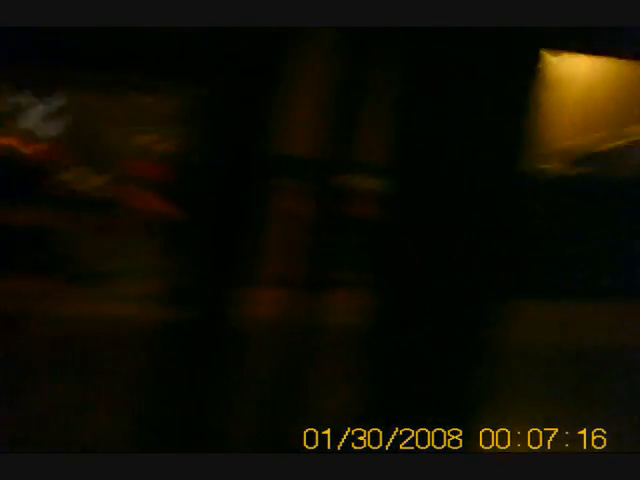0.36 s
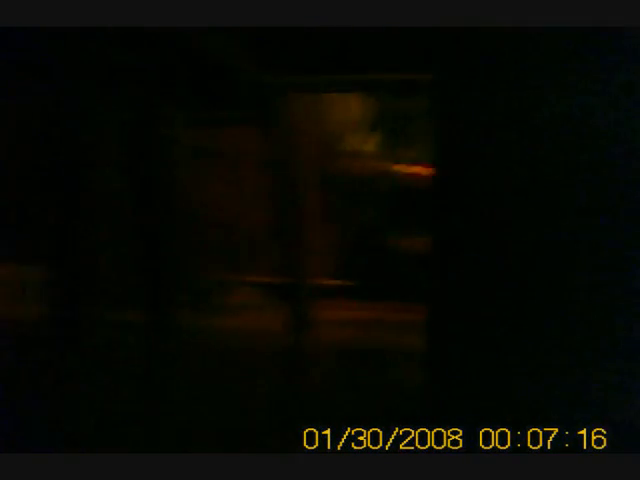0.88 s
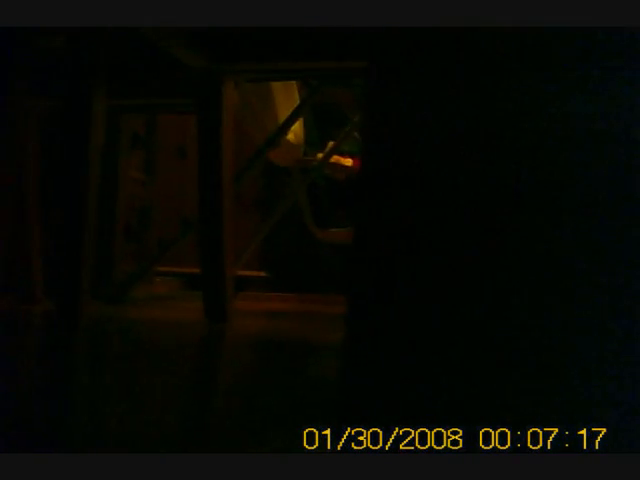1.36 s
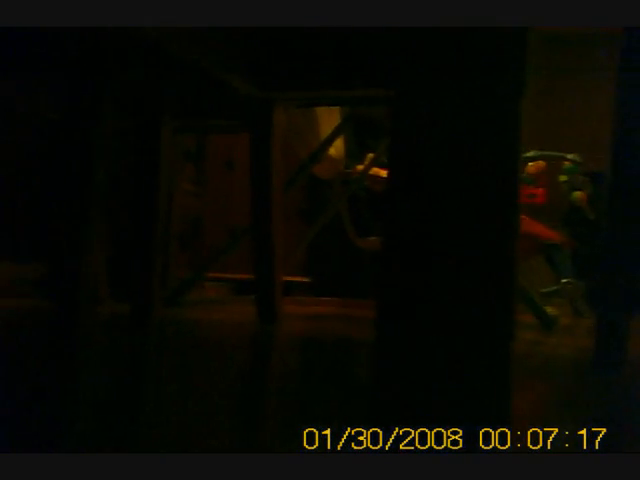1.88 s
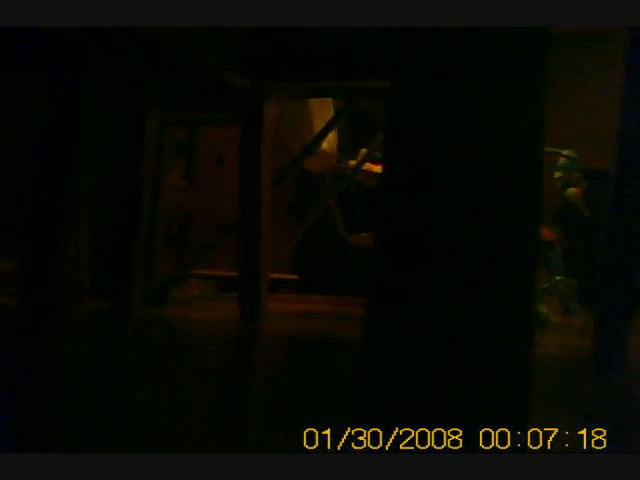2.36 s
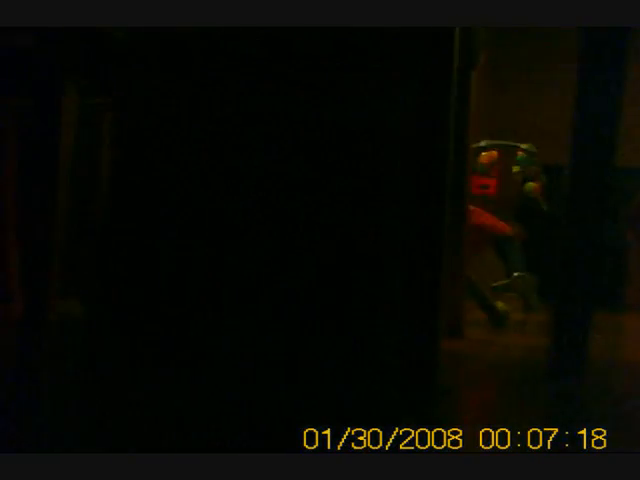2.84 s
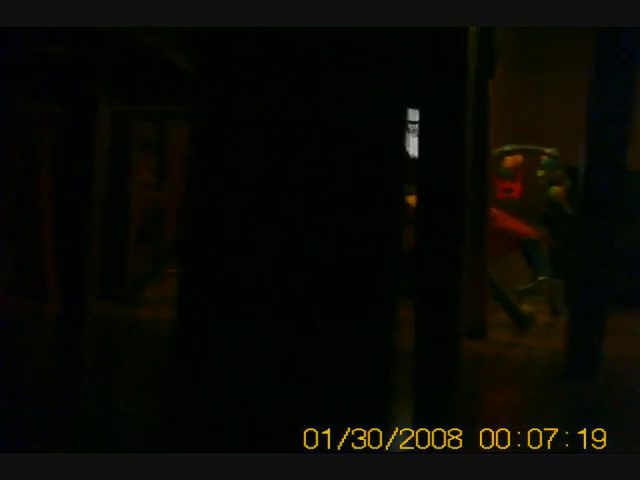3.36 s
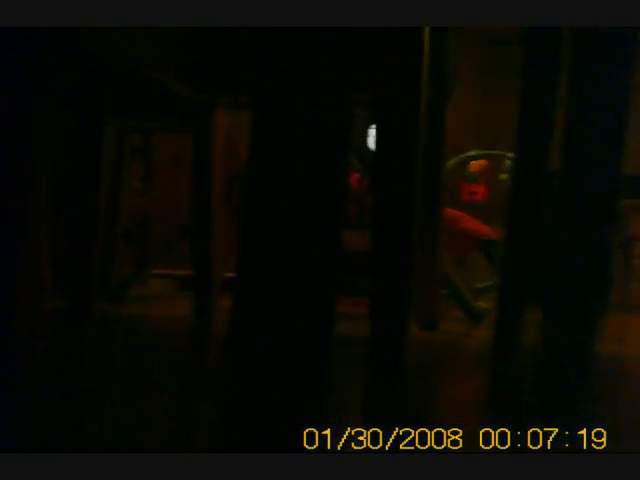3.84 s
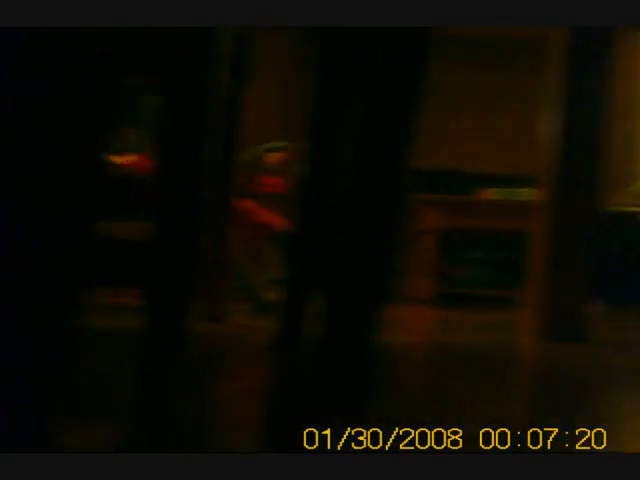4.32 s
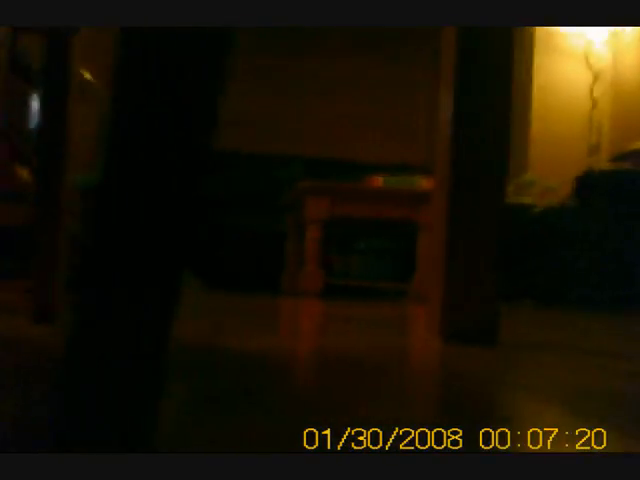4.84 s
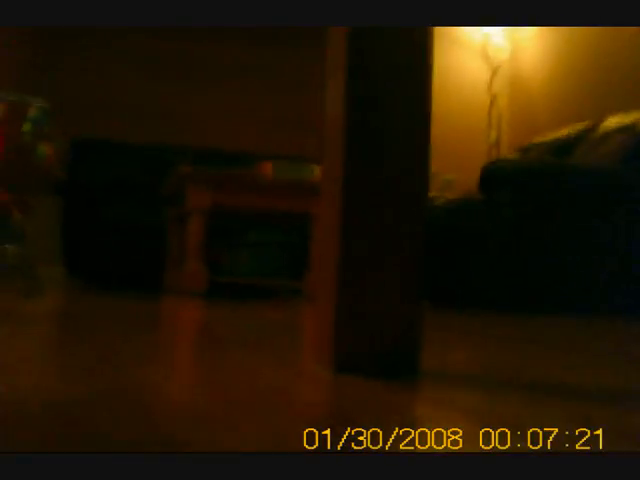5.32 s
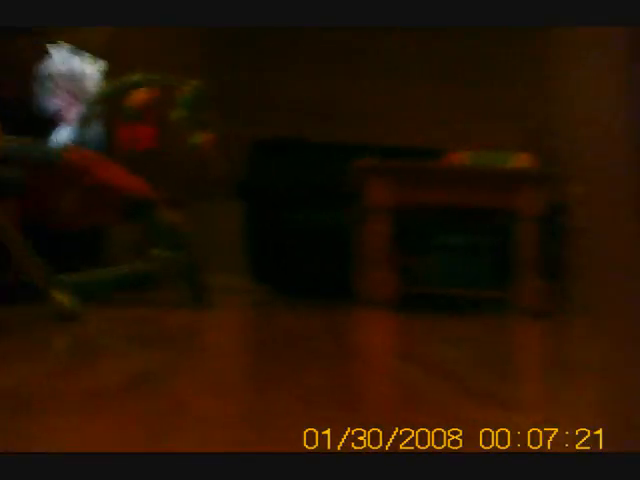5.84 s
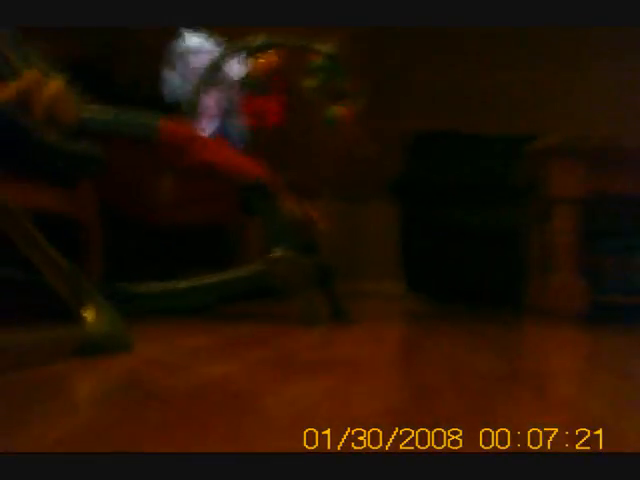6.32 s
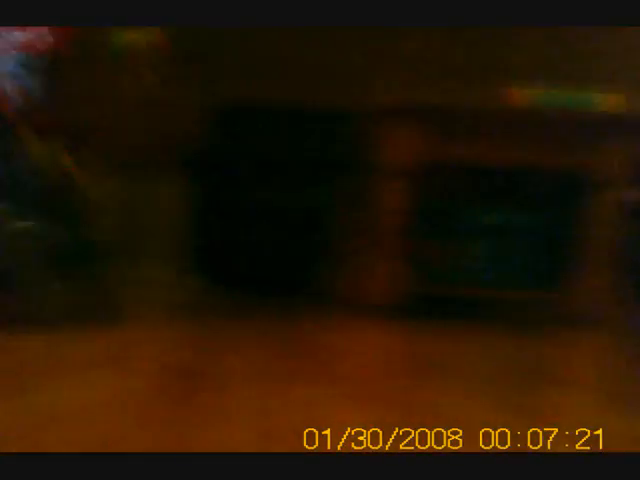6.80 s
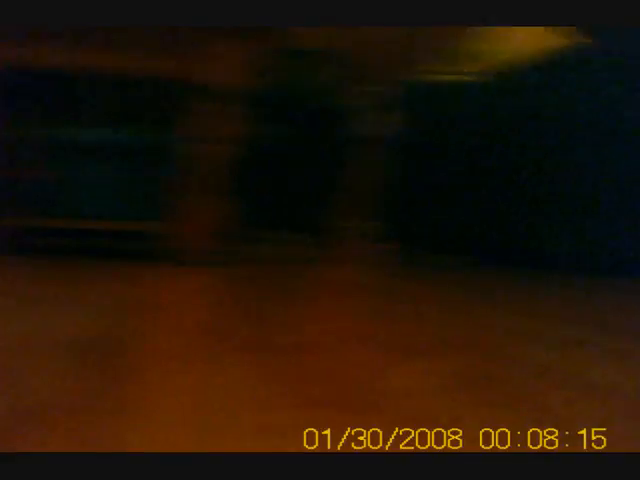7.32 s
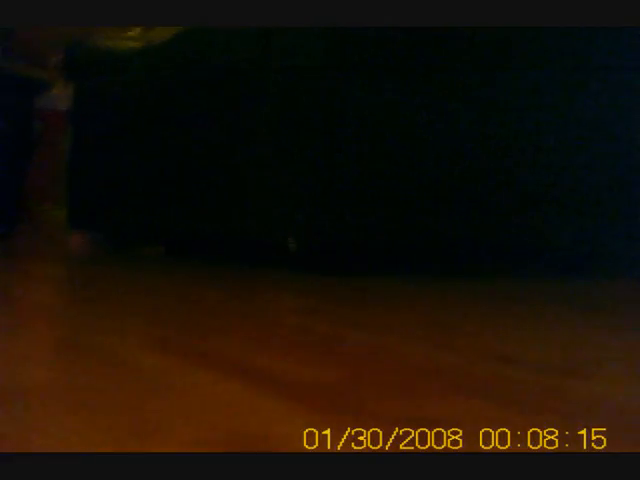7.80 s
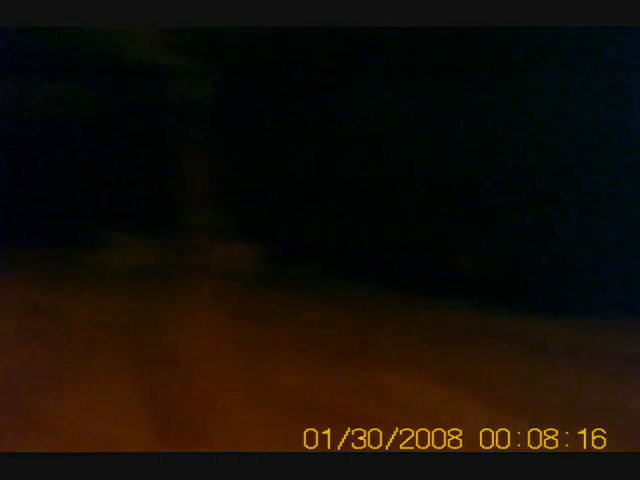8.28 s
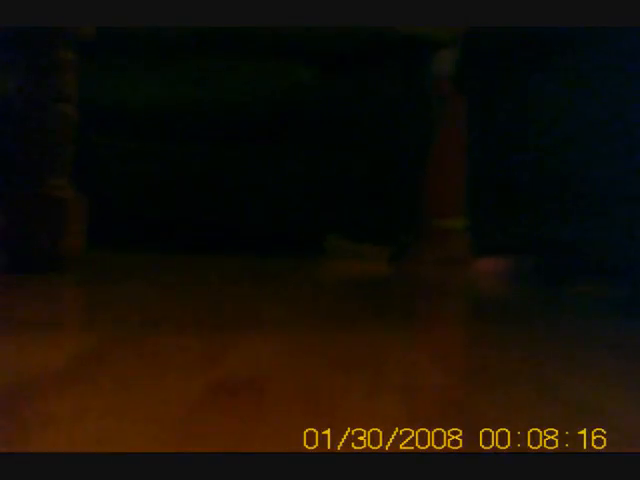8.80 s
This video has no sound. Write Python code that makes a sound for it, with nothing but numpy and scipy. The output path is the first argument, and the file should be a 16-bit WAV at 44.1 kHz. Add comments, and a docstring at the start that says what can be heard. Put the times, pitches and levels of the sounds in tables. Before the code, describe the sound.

Heard from on board, a small motorised toy whirs, clunks hard, creeps in fits and starts, then speeds up into a harsh buzzing whir.

```python
"""On a wooden floor, a toy car carrying a tiny camera starts, stops, bumps and runs.
Pinion teeth puff noise and sing multiples of their mesh rate through the plastic shell's ringing modes.
Loose parts tick in clumps each wheel turn and the tyres rumble as lumpy noise.
Knocks ring a panel, crack and thump; wheel jolts push the microphone with a short low tone.
The cheap recorder hisses, is narrow-band, sits off centre and overloads."""
import sys
import numpy as np
from scipy import signal
from scipy.fft import rfft, irfft, next_fast_len
from scipy.io import wavfile
from scipy.ndimage import uniform_filter1d

SR = 44100
rng = np.random.default_rng(int(sys.argv[2]) if len(sys.argv) > 2 else 0)


def wav_record(signal):
    """Record a signal, one row per channel, as 16-bit PCM in the file named by sys.argv[1]."""
    frames = np.transpose(np.atleast_2d(signal))
    bounded = np.clip(frames, -1, 1)
    # unit amplitude maps onto the largest positive 16-bit level
    quanta = np.round(bounded * 32767).astype(np.int16)
    wavfile.write(sys.argv[1], SR, quanta)


def invert_db(x):
    """Field ratio 10**(x/20) for x, a level in decibels (scalar or array-like)."""
    u = np.asarray(x, float) / 20
    return 10 ** u


N = 403956  # samples


def evened(x):
    """Scales to rms 1."""
    return x / np.sqrt(np.mean(x ** 2) + 1e-20)


def curve(rows):
    """Interpolates the columns of a timed table at every sample."""
    time_s, *columns = np.transpose(rows)
    return [np.interp(np.arange(N) / SR, time_s, column) for column in columns]


def band(x, lo_hz, hi_hz):
    """Band-pass filter."""
    return signal.sosfilt(signal.butter(3, [lo_hz, hi_hz], "band", fs=SR, output="sos"), x)


def coloured(points):
    """Steady noise of rms 1, shaped by a spectrum drawn over log frequency."""
    size = next_fast_len(N)
    hz = np.fft.rfftfreq(size, 1 / SR)
    point_hz, point_db = np.transpose(points)
    gain = invert_db(np.interp(np.log(hz + 1), np.log(point_hz + 1), point_db))
    return evened(irfft(rfft(rng.standard_normal(size)) * gain, size)[:N])


# pace of the gear train: (time [s], mean mesh rate [pinion teeth per s])
SPEED = [(0, 640), (.5, 680), (.74, 760), (.96, 275), (1.08, 290), (1.11, 205), (1.2, 80), (1.4, 150),
         (1.65, 330), (1.79, 205), (1.88, 235), (2.05, 60), (2.15, 100), (2.22, 165), (2.3, 215),
         (2.52, 345), (2.62, 370), (2.7, 250), (2.77, 245), (3, 60), (3.1, 200), (3.5, 420), (3.8, 450),
         (4.02, 60), (4.2, 180), (4.33, 235), (4.38, 232), (4.62, 385), (4.72, 460), (4.9, 615), (5.1, 658),
         (5.55, 785), (5.75, 835), (6, 862), (6.6, 898), (6.95, 780), (7.1, 770), (7.39, 830), (7.42, 585),
         (7.52, 660), (7.8, 800), (8, 870), (8.2, 915), (8.35, 880), (9.16, 1012)]


def tooth_rate():
    """How many pinion teeth mesh each second as the car starts, stops and runs."""
    return curve(SPEED)[0]


CRAWL, AT_SPEED = 281, 628  # teeth per s between which the shell's sound fills in


def fullness(teeth):
    """0 at a crawl, 1 at speed."""
    return np.clip((teeth - CRAWL) / (AT_SPEED - CRAWL), 0, 1)


TEETH_PER_WHEEL_TURN = 65


def wheel_beat(teeth, depth_db):
    """A wheel out of true loads the car once a turn, a little unevenly."""
    turns = np.cumsum(teeth) / SR / TEETH_PER_WHEEL_TURN
    unevenness = 0.71 * evened(band(rng.standard_normal(N), 0.83, 4))  # radians
    return invert_db(depth_db * np.cos(2 * np.pi * turns + unevenness))


# shell modes: (centre [Hz], width [Hz], then relative level at a crawl [dB], # at speed before 7.41 s [dB], at
# speed from 7.41 s [dB], when knocked [dB])
SHELL = [(446, 492, -7.5, -14, -14.5, 1), (989, 80, -3, -6.5, -7.5, -33.5),
         (1027, 443, -6, -13.5, -13.5, -2), (1175, 720, -9, -9, -9, -2), (1688, 379, 3.5, -1, -1.5, 4),
         (2061, 418, 7.5, 2.5, 4.5, -11), (2487, 475, -11, -6.5, -6, -0.5),
         (3166, 980, -12, -11.5, -10, -0.5), (3794, 880, -3.5, -10, -7, -1.5),
         (4384, 305, -2, -9.5, -8.5, -5), (4950, 890, -17, -18.5, -12.5, -7),
         (5830, 1000, -22, -19, -11.5, -2), (6680, 650, -12, -14.5, -18.5, -14.5),
         (6900, 1600, -37.5, -38.5, -18, -8.5), (7845, 630, -13, -13.5, -38, -23.5),
         (7670, 1200, -56, -41.5, -30, -8), (8480, 930, -20.5, -21, -28, -15.5),
         (9900, 3300, -65.5, -36, -34.5, -11.5)]


def shell(x, axis):
    """Causal ringing of the plastic shell: the summed power of its steep modes, in minimum phase."""
    hz = abs(np.fft.fftfreq(8192, 1 / SR))
    power = sum(invert_db(2 * mode[axis]) / (1 + (2 * (hz - mode[0]) / mode[1]) ** 4) ** 2 for mode in SHELL)
    log_gain = np.log(power + 1e-6) / 2
    ring = np.fft.ifft(np.exp(np.conj(signal.hilbert(log_gain)))).real[:2048]
    x = np.atleast_2d(x)
    rung = signal.fftconvolve(x, ring[None] / np.linalg.norm(ring), axes=1)
    return rung[:, :x.shape[1]].squeeze()


# running level of the gear noise, before dips and jerks: (time [s], level [dB])
DRIVE = [(0, -18.5), (.74, -15.5), (.79, -25), (.93, -28), (1.02, -30.5), (1.12, -31.5), (1.135, -53),
         (1.2, -67), (1.38, -87), (1.39, -37.5), (1.52, -31), (1.6, -26.5), (1.68, -24.5), (1.81, -26),
         (1.93, -37), (1.955, -48), (2.055, -72), (2.14, -39), (2.152, -41), (2.26, -30), (2.4, -27),
         (2.66, -25.5), (2.71, -29.5), (2.765, -37), (2.775, -42), (2.98, -66.5), (3.09, -66), (3.105, -27),
         (3.4, -26), (3.77, -20.5), (3.9, -30), (3.99, -38), (4.0, -61), (4.03, -43), (4.036, -52),
         (4.09, -36), (4.24, -27.5), (4.92, -17), (5.8, -13.5), (7.4, -13), (8.17, -12.5), (9.16, -15)]
# brief dips of the running level: (start [s], length [s])
CUTS = [(3.174, 0.021), (3.258, 0.016), (3.282, 0.01), (3.396, 0.02)]
CUT_DB = -13
# the gears jerk and scrape for a moment after a bump: (start [s], level [dB], length [s])
JERKS = [(.759, -15, .02), (.812, -21, .045), (1.04, -25, .06), (1.15, -36, .045), (1.389, -26, .02),
         (2.098, -32, .03), (2.618, -19, .03), (2.652, -16.5, .028), (2.776, -25, .045), (2.841, -37, .024),
         (2.902, -45, .01), (2.955, -41, .03), (3.345, -22, .05)]
JERK_FALL_DB = -16  # reached at the end of its length


def gear_level():
    """The running level in dB, cut out now and then, with the power of the jerks added."""
    t = np.arange(N) / SR
    running_db = curve(DRIVE)[0]
    cut = sum((t > start) * (t < start + length) * 1. for start, length in CUTS)
    running_db = running_db + CUT_DB * uniform_filter1d(cut, size=100)
    jerks = 0
    for start, top_db, length in JERKS:
        fall_db = JERK_FALL_DB * np.clip((t - start) / length, 0, 4) ** 2
        jerks = jerks + (t > start) * invert_db(2 * (top_db + fall_db))
    return 10 * np.log10(invert_db(2 * running_db) + uniform_filter1d(jerks, size=100))


# how hard the motor pushes the teeth together when pulling away: (time [s], share [0-1])
BITE = [(0, .3), (.8, .2), (1.2, .2), (1.9, .2), (2.12, .3), (2.17, 1), (2.45, 1), (2.6, .3), (3.95, .2),
        (4.03, 1), (4.55, 1), (4.8, .4), (9.16, .3)]
# how roughly the car rides, as loose parts against the gear noise: (time [s], level [dB])
LOOSE = [(0, -6), (.4, -13.5), (.84, 0), (.93, -21), (1.02, -29), (1.06, -3), (1.11, -30), (1.16, -5),
         (1.45, -27), (1.55, -1), (1.68, -18), (1.8, -13), (1.9, -39), (2.2, -38), (2.4, -15.5),
         (2.63, -3.5), (2.69, -23), (2.76, -23), (2.8, 4), (2.95, -12), (3.12, -4), (3.3, -10.5), (3.45, 2),
         (3.6, -12.5), (3.8, -2.5), (3.88, -32), (4.15, -40), (4.65, -19), (4.8, -7.5), (6.0, -7),
         (7.0, -10.5), (8.0, -8.5), (9.16, -9.5)]
# how clearly a multiple of the mesh sings, by its pitch: (pitch [Hz], relative level [dB])
SINGS = [(300, -24), (430, -6), (550, -4), (640, -22), (820, -11), (1000, -12), (1200, -22), (1400, -9),
         (1750, -9), (2150, -8), (2600, -19), (4000, -28)]
# the mesh tone's multiples, first to fourth: relative level [dB]
MULTIPLES_DB = [-4, 0, -6, -12.5]
# gaining speed under load sharpens the whine; a rough crawl buries it (loss in dB per dB of roughness)
GAINING_DB, ROUGH_FROM_DB, ROUGH_LOSS = 4, -22, 1.1


def sing(teeth, count):
    """Multiples of the mesh tone, clear where the car's body takes them up."""
    growth = uniform_filter1d(np.gradient(np.log(teeth)) * SR, size=4000)  # relative gain per s
    gaining = np.clip(growth, 0, 1) * np.maximum(curve(BITE)[0], fullness(teeth))
    rough = np.maximum(curve(LOOSE)[0] - ROUGH_FROM_DB, 0) * (1 - fullness(teeth))
    pitch_hz, pitch_db = np.transpose(SINGS)
    whine = 0
    for k, own_db in enumerate(MULTIPLES_DB, start=1):
        body_db = np.interp(np.log(k * teeth), np.log(pitch_hz), pitch_db)
        whine = whine + invert_db(own_db + body_db) * np.cos(2 * np.pi * k * count)
    return invert_db(GAINING_DB * gaining - ROUGH_LOSS * rough) * whine


PINION_TEETH = 8
LATER_SHELL_S = 7.41  # from here the shell at speed takes its later levels


def gears(teeth, level_db):
    """Each tooth puffs noise over a steadier grind; the pinion runs off centre, going slack once a turn."""
    wander = 1 + .011 * evened(band(rng.standard_normal(N), 4, 40))
    count = np.cumsum(teeth * wander) / SR
    bite = curve(BITE)[0]
    size = invert_db(1.3 * rng.standard_normal(SR // 4))[count.astype(int)]  # one draw per tooth
    puff = 1 - bite * (.9 - np.exp(-(count % 1) / teeth / .0016))  # dies away over 1.6 ms
    slack = 1 - .85 * bite * np.exp(-((count / PINION_TEETH % 1 - .88) / .1) ** 2)
    flutter, waver = (evened(band(v, 18.2, 150)) for v in rng.standard_normal((2, N)))
    puffs, grind = rng.standard_normal((2, N)) * invert_db(2.38 * flutter) * [size * puff * slack, slack ** 0.082]
    # hold both at an even level over an eighth of a second
    puffs, grind = (v / np.sqrt(uniform_filter1d(v ** 2, SR // 8)) for v in (puffs, grind))
    # single teeth stand out in the treble; lower down they merge with the grind
    noise = band(puffs, 2320, 15400) + 0.9 * band(grind, 28, 2660) + 0.59 * band(puffs, 30, 3440)
    whine = sing(teeth, count) * invert_db(4.5 * waver - 6.5)
    drive = (noise + whine) * invert_db(level_db) * wheel_beat(teeth, 0.53)
    # crossfade the shell from crawl to speed by power
    fast = fullness(teeth)
    later = np.arange(N) > LATER_SHELL_S * SR
    parts = np.sqrt(1 - fast), np.sqrt(fast) * ~later, np.sqrt(fast) * later
    return invert_db(.6) * sum(shell(drive * part, axis=2 + k) for k, part in enumerate(parts))


def rattle(teeth, level_db):
    """Loose plastic ticks in clumps, most where the wheel jolts; a few ticks are large."""
    chance, size, grit = rng.random(N), rng.exponential(1, N), rng.standard_normal(N)
    clumps = invert_db(6 * evened(band(rng.standard_normal(N), 2, 25)))
    struck = chance < 170 / SR * clumps * wheel_beat(teeth, 7.)  # 170 ticks per s before clumping
    ticks = struck * invert_db(3.6 * np.minimum(size, 4))
    bursts = signal.lfilter([1], [1, -np.exp(-1 / (0.00029 * SR))], ticks) * grit  # 0.29 ms decay
    return shell(evened(bursts) * invert_db(level_db + curve(LOOSE)[0]), axis=5)


# spectrum of the rolling rumble: (frequency [Hz], relative level [dB per Hz])
TYRES = [(12, -36), (20, -9.5), (97, 2.5), (140, 0.5), (273, -5.5), (576, -26), (743, -8), (900, -17),
         (1170, -40.5), (1980, -120)]
# rumble against the gear noise: base, dB per dB of roughness, extra at full speed
TYRE_DB, TYRE_PER_LOOSE, TYRE_AT_SPEED_DB = -4.5, 0.43, -2.5


def tyres(teeth, gear_db):
    """Lumpy rolling rumble carried through the chassis, following the gears and louder on a rough ride."""
    level_db = gear_db + TYRE_DB + TYRE_PER_LOOSE * curve(LOOSE)[0] + TYRE_AT_SPEED_DB * fullness(teeth)
    lumps = invert_db(2.7 * evened(band(rng.standard_normal(N), 11.4, 30)))
    return invert_db(level_db) * evened(coloured(TYRES) * lumps * wheel_beat(teeth, 0.84))


# spectrum of the recorder's hiss: (frequency [Hz], relative level [dB per Hz])
HISS = [(20, -8), (50, 4), (132, -7), (192, -20), (249, -3), (407, -18), (681, -9), (924, -20), (9620, -26),
        (10800, -28), (14100, -58), (22000, -120)]


def hiss():
    """The recorder's steady noise floor, as coloured noise."""
    return invert_db(-59.5) * coloured(HISS)  # rms dB


# lesser knocks: share of wheel turns at full speed, mean levels and their spread
BUMP_SHARE, BUMP_DB, BUMP_TREBLE_DB, BUMP_SPREAD_DB = .3, -10.5, -15, 4


def bumps(teeth):
    """Some wheel turns give a lesser knock, likelier the faster the car; returns rows for knocks()."""
    turns = np.cumsum(teeth) / SR / TEETH_PER_WHEEL_TURN
    at = np.flatnonzero(np.diff(np.floor(turns)))
    luck = rng.random(len(at))
    body, treble = rng.standard_normal((len(at), 2)).T
    body_db, treble_db = BUMP_DB + BUMP_SPREAD_DB * body, BUMP_TREBLE_DB + BUMP_SPREAD_DB * treble
    rows = np.transpose([at / SR, body_db, treble_db])
    return rows[luck < BUMP_SHARE * fullness(teeth[at]) ** 2]


# knocks of the chassis and gear backlash, before the mix trims:
# (time [s], body level [dB], treble level [dB])
KNOCKS = [(.2477, 1, -12.5), (.3455, 4, -15.5), (.4428, 3.5, -19), (.5151, 0, -15.5), (.632, 2.5, -8.5),
          (.754, 21.5, -8), (.7564, -23, 3), (.7594, -1, -1), (.8119, -21.5, 2.5), (.8189, 8.5, -10),
          (.834, -2.5, -21), (1.036, 0, -25), (1.0584, 1, -20), (1.1487, -4, -52), (1.1914, -29, -50),
          (1.2231, -31.5, -52), (1.3919, -2.5, -30), (1.5408, -10, -24), (1.662, -6, -57), (1.703, -6, -36),
          (2.0667, -34, -57), (2.1068, -5, -54), (2.6225, -9, -24), (2.6304, -6, -28.5),
          (2.6516, 6.5, -9.5), (2.6563, 2.5, -5), (2.6658, 0.5, -19), (2.774, -2, -39.5),
          (2.8399, -8.5, -54), (2.8868, -10.5, -56), (2.904, -16, -69), (2.9238, -28, -66),
          (2.9552, -19.5, -39), (3.1047, -6, -37), (3.1188, -13, -19.5), (3.1981, -4.5, -46),
          (3.2789, -11, -48), (3.2959, -3, -49), (3.3174, -7.5, -19), (3.418, -7, -28), (3.63, -3, -22.5),
          (3.6897, 1.5, -14.5), (3.752, 6.5, -17), (3.9378, -15, -65), (4.767, -16, -14.5),
          (4.8424, -18, -15), (4.9895, 1, -13), (5.4611, -11, -15), (5.5446, -5.5, -10), (5.9932, 6, -8),
          (6.066, -1, -5.5), (6.3459, 7.5, -5.5), (6.521, 7, -10), (6.8317, -8.5, -5.5), (6.854, 7.5, -4.5),
          (7.166, -12, -6.5), (7.2503, 4.5, -5.5), (7.6734, -7.5, -9), (7.9367, 0, -11.5),
          (8.069, -2.5, -11), (8.1442, -1.5, -8), (8.3388, -23.5, -10.5), (8.7822, -15.5, -5)]
# modes of the struck shell panel: (frequency [Hz], relative level [dB])
PANEL = [(1700, 2), (2070, -7), (2250, -10.5)]
RING_S = .026  # the blow falls 60 dB in this time
# knocks whose treble is this far down are backlash: mostly the upper modes ring, rising more slowly
SOFT_FROM_DB, SOFT_RISE_S = 16, .0007


def knocks(teeth):
    """Each knock rings a shell panel, cracks in the treble and pushes the microphone."""
    rows = np.vstack([KNOCKS, bumps(teeth)])
    out, t = np.zeros(N + 4096), np.arange(4096) / SR
    start_s, db, treble_db = np.transpose(rows)[:, :, None]
    fade = invert_db(-60 * t / RING_S)
    blow = shell(rng.standard_normal((len(rows), 4096)) * fade, axis=5)
    body = band(blow, 390, 2900)
    crack = band(blow * invert_db(-60 * t / 0.014), 4180, 12000)
    spot = rng.random((len(rows), len(PANEL))) ** 2  # where it is struck weights the modes
    soft = np.clip((db - treble_db - SOFT_FROM_DB) / 10, 0, 1)
    upper = np.transpose(PANEL)[0] > 1900
    spot = spot * (1 - soft) + soft * (spot + .5) * upper
    modes = [invert_db(mode_db) * np.sin(2 * np.pi * hz * t) for hz, mode_db in PANEL]
    rise = np.minimum(t / (soft * SOFT_RISE_S + 1e-4), 1)
    panel = spot @ modes * fade ** 1.33 * rise
    body, crack, panel = (v / abs(v).max(axis=1, keepdims=True) for v in (body, crack, panel))
    thump = band(np.sin(2 * np.pi * 150 * t) * invert_db(-60 * t / 0.02), 98, 650)
    tone = (.45 - .22 * soft) * body + (.42 + .35 * soft) * panel
    sounds = invert_db(db - 3.5) * tone + invert_db(treble_db - 9) * thump + invert_db(treble_db + 8.5) * crack
    for start, sound in zip(start_s[:, 0], sounds):
        out[round(start * SR):][:4096] += sound
    return out[:N]


# low jolts of the wheels on the floor: (time [s], peak level [dB])
JOLTS = [(0.24, -23), (0.806, -6.5), (2.645, -9), (3.31, -26), (3.448, -20), (4.562, -21), (4.833, -15.5),
         (5.058, -15), (5.374, -17), (5.507, -13), (5.617, -20), (6.602, -15), (6.822, -14), (7.07, -18),
         (7.243, -14), (8.132, -16)]


def jolts():
    """Each jolt pushes the microphone once, as a fast-fading low tone."""
    out, t = np.zeros(N), np.arange(4096) / SR
    for start, db in JOLTS:
        out[round(start * SR)] = invert_db(db)
    push = band(np.sin(2 * np.pi * 130 * t) * invert_db(-60 * t / 0.019), 60, 500)
    return signal.oaconvolve(out, push / abs(push).max())[:N]


def scene():
    """The car heard from on board, over the recorder's hiss."""
    teeth = tooth_rate()
    gear_db = gear_level()
    car = gears(teeth, gear_db) + rattle(teeth, gear_db) + tyres(teeth, gear_db)
    car += knocks(teeth) + jolts()
    return (car + hiss())[None]


def band_limit(x):
    """A steep low-pass at the top of the band."""
    return signal.sosfilt(signal.butter(12, 10970, fs=SR, output="sos"), x)


EDGE_HZ, TOP_HZ = 10680, 16000  # low-pass before and after the overload
OFFSET, CEILING = -0.0075, 1  # of full scale


def record(dry):
    """Band limit, offset, then hard overload, which throws streaks above the band edge."""
    edge = signal.firwin(401, EDGE_HZ, window=("kaiser", 8), fs=SR)
    narrow = signal.oaconvolve(dry, edge[None], "same")
    loaded = np.clip(narrow + OFFSET, -CEILING, CEILING)
    top = signal.firwin(101, TOP_HZ, window=("kaiser", 8), fs=SR)
    mix = signal.oaconvolve(loaded, top[None], "same")
    return band_limit(mix)


dry = scene()
out = record(dry)
wav_record(out)
```